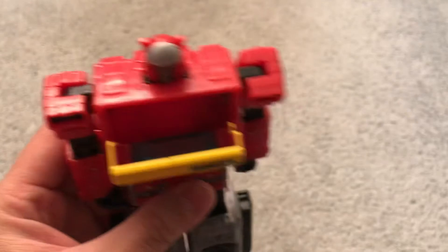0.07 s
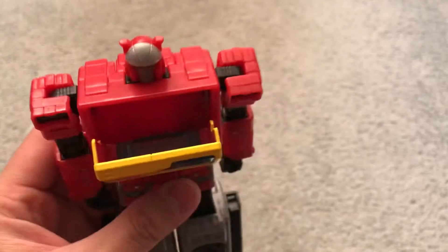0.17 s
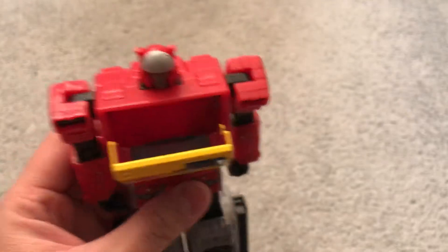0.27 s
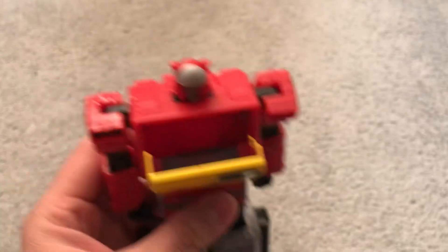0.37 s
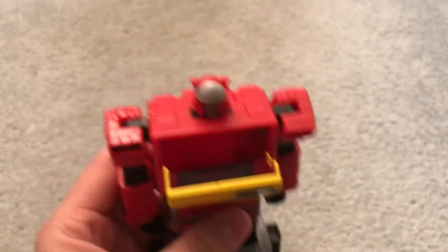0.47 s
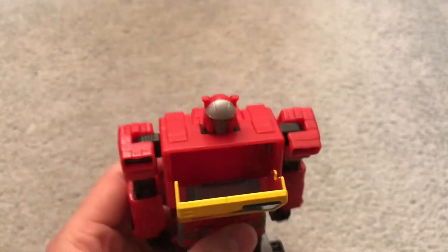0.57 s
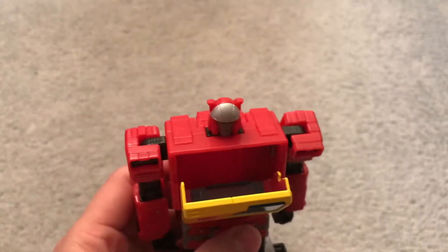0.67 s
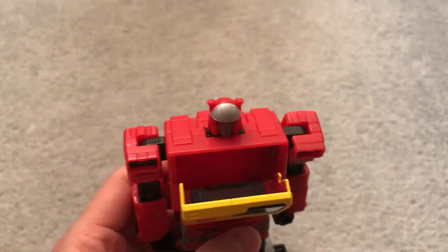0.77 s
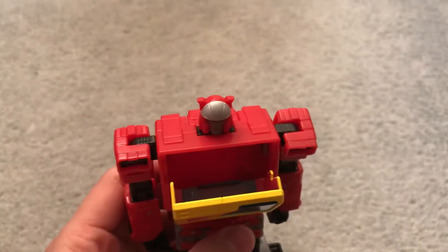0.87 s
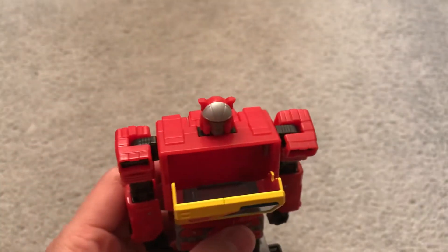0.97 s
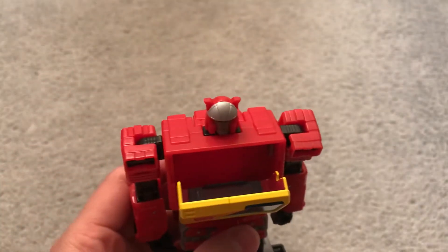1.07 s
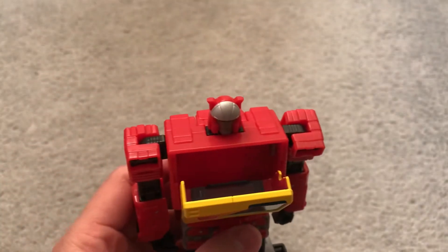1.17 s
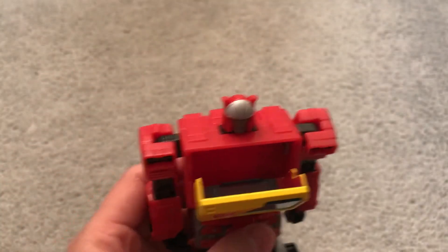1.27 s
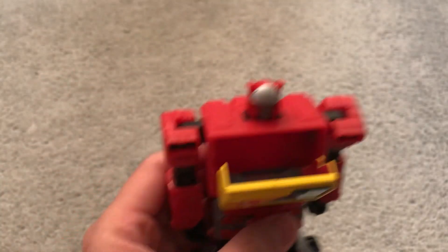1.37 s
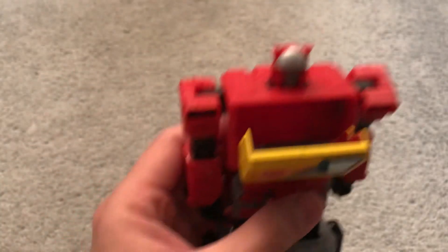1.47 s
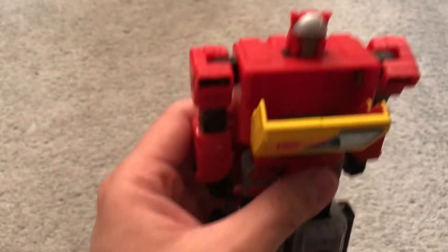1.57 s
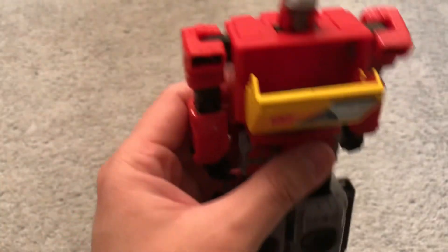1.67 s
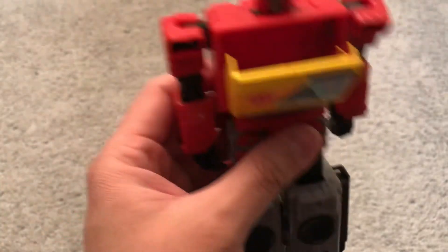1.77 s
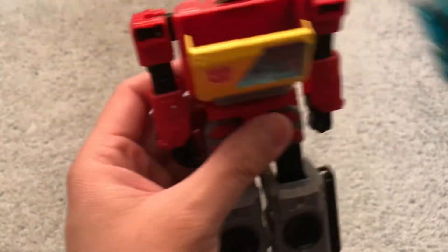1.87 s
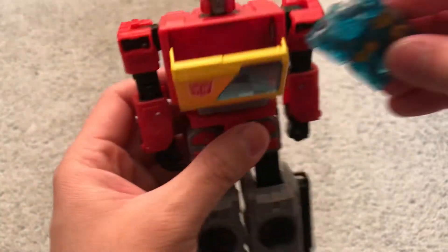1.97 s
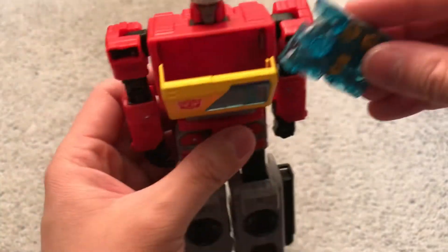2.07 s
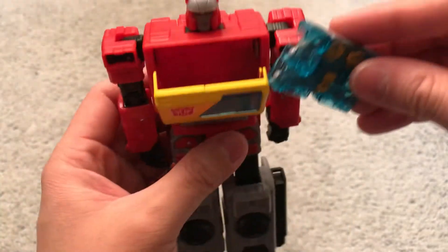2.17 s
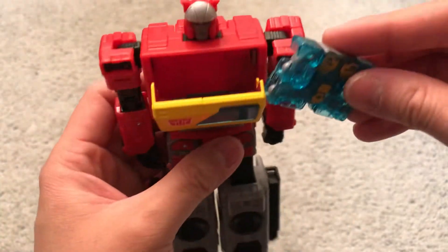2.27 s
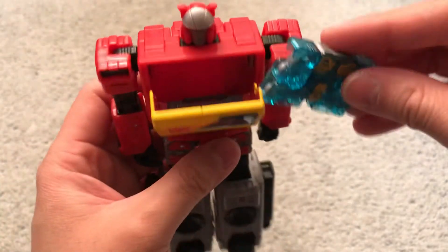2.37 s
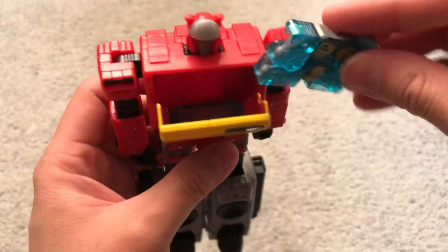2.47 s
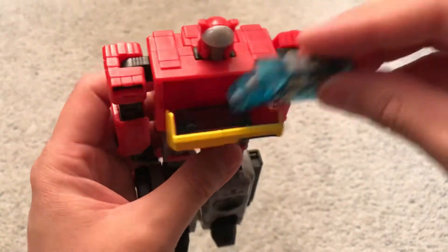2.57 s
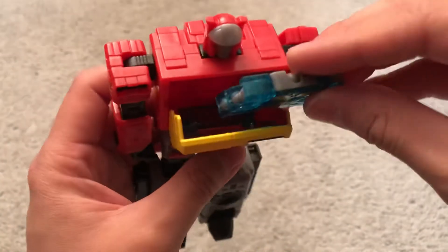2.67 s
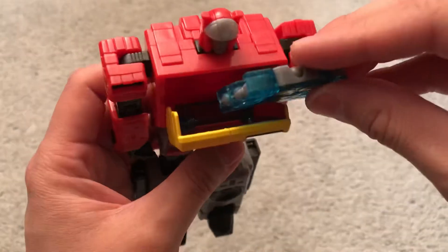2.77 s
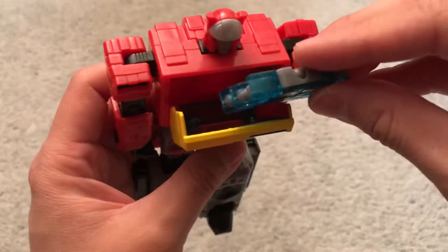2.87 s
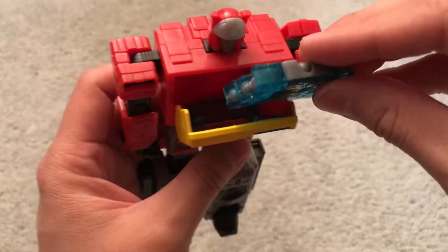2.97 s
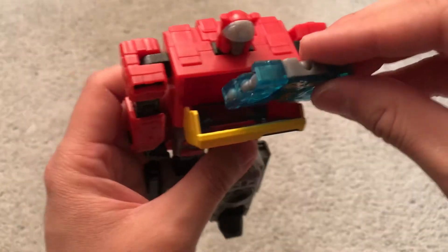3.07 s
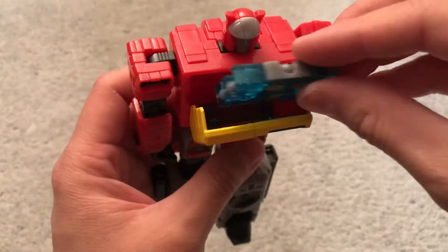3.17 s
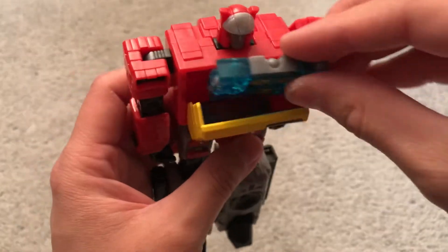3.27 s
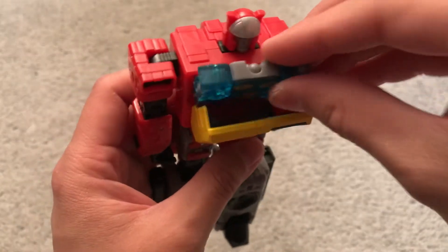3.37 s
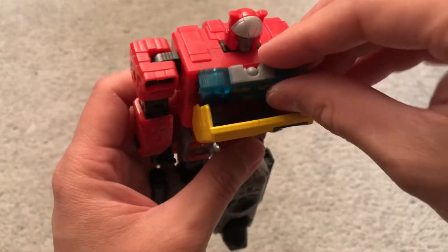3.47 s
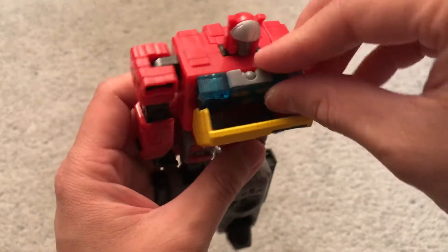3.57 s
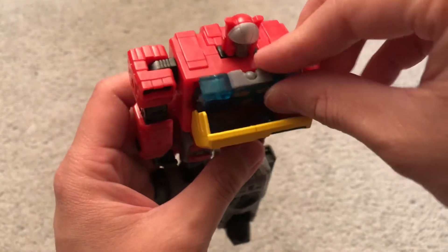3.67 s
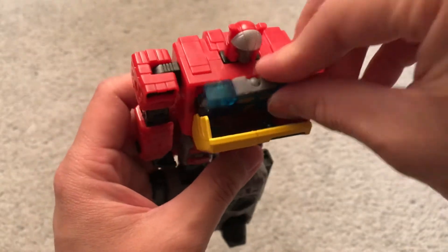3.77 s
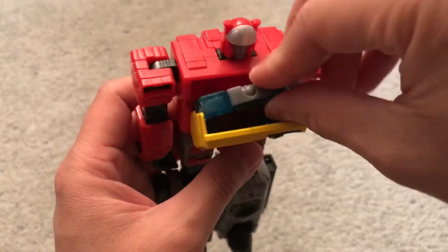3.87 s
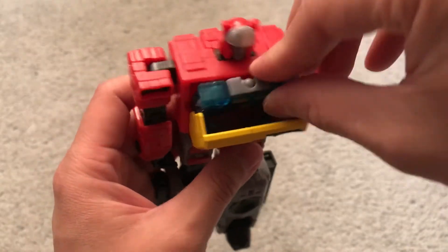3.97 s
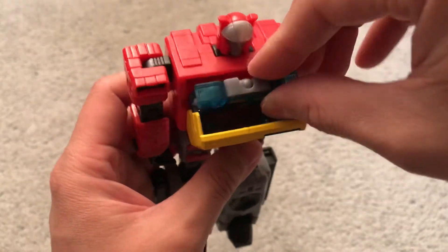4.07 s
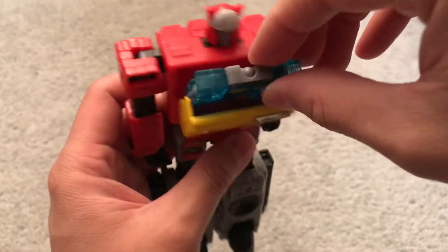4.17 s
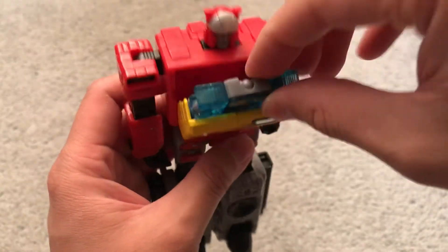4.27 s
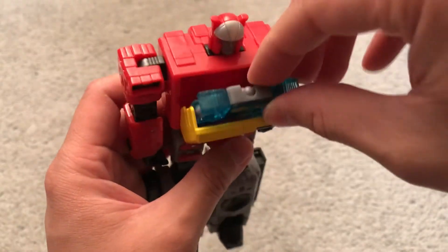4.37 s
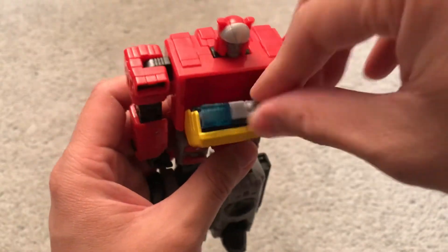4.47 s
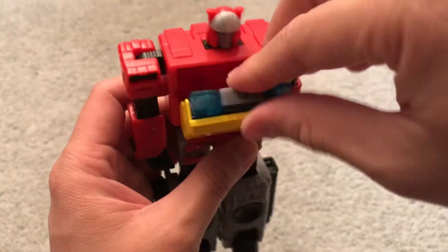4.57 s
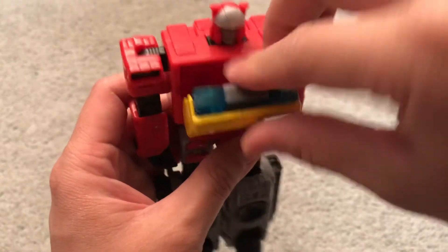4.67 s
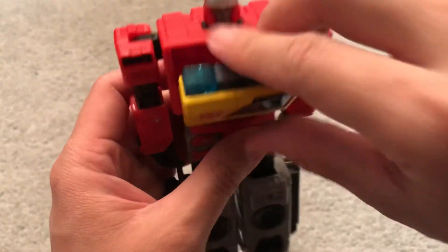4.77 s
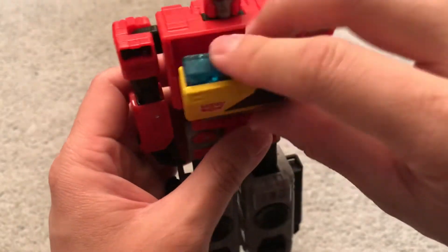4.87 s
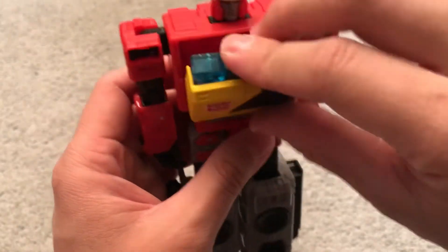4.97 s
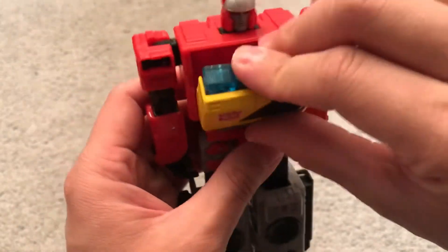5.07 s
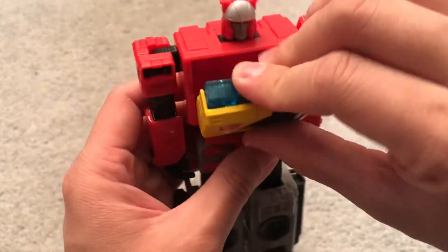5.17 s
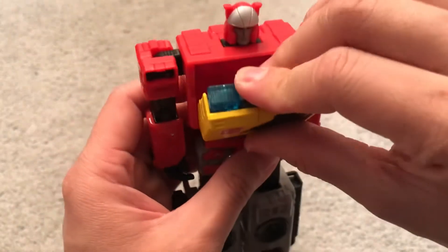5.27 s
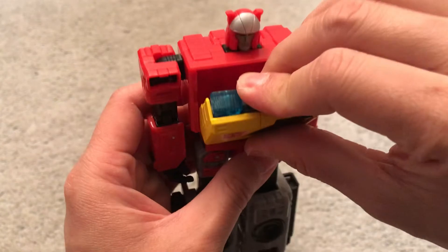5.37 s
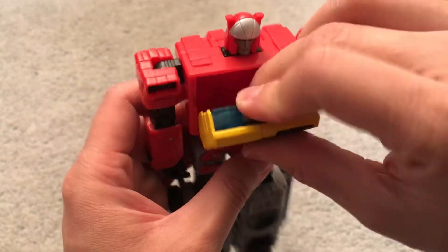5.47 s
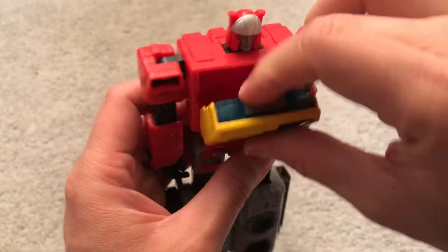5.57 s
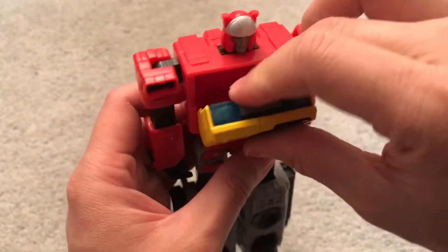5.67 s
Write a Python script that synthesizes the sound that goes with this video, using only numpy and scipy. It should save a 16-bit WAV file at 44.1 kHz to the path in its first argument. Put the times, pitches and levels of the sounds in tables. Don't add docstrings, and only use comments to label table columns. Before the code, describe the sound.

Close phone pickup of hands working a small hollow plastic toy in a quiet carpeted room, with faint mains hum, low building rumble and soft hiss throughout. After a quiet start, loose parts bump and scrape around 0.65 s, and a rattly double clack at 0.8 s makes the thin door ring briefly. A duller knock comes at 1.3 s, then mostly faint rubbing and a soft sleeve rustle from 1.5 to 2 s. Clicks resume at 2.2 s, with a stronger hollow knock at 2.6 s. From 3.0 to 3.6 s bright clacks come quickly as a block touches the shell; small taps and rubs continue, thickening into clicks and scrapes at 4.1 to 4.3 s. A crisp snap lands at 4.45 s. Quieter bumps, slides and ticks follow, a few clicks gather around 5.3 s, and the loudest, hard, bright catch snap strikes at 5.43 s, dying quickly into room tone.

```python
import sys
import numpy as np
from scipy import signal
from scipy.fft import rfft, irfft, next_fast_len
from scipy.io import wavfile
from scipy.ndimage import uniform_filter1d

SR = 44100
rng = np.random.default_rng(int(sys.argv[2]) if len(sys.argv) > 2 else 0)


def dump_mix(stems):
    frames = np.atleast_2d(stems).T
    limited = np.clip(frames, -1, 1)
    pcm = np.round(limited * 32767).astype(np.int16)
    wavfile.write(sys.argv[1], SR, pcm)


def natural_amplitude(level_db):
    exponent = np.asarray(level_db, float) / 20
    return 10 ** exponent


N = 252252

EDGE_HOLD, PART_HOLD = 0.064, 0.88


def evened(x):
    return x / np.sqrt(np.mean(x ** 2) + 1e-20)


def peaked(x):
    return x / np.sqrt(uniform_filter1d(x ** 2, size=60).max())


def read(points, hz):
    f, value = np.transpose(points)
    return np.interp(np.log(hz + 1), np.log(f + 1), value)


def add(mix, s, sound):
    part = mix[round(s * SR):][:len(sound)]
    part += sound[:len(part)]


def resonate(x, modes):
    size = next_fast_len(len(x) + 1024)
    f = np.fft.rfftfreq(size, 1 / SR)
    hz, width, db = np.transpose(modes)[:, :, None]
    single = 1.5j * f * width / (hz ** 2 - f ** 2 + 1.5j * f * width)
    response = (natural_amplitude(db) * single ** 2).sum(0)
    return irfft(rfft(x, size) * response, size)[:len(x)]


def coloured(points):
    size = next_fast_len(N)
    hz = np.fft.rfftfreq(size, 1 / SR)
    spectrum = rfft(rng.standard_normal(size)) * natural_amplitude(read(points, hz))
    return evened(irfft(spectrum, size)[:N])


def drift(size):
    once = uniform_filter1d(rng.standard_normal(N), size)
    return evened(uniform_filter1d(once, size))


def brightened(modes, treble_db, share):
    return [(f, w, d + share * treble_db * np.log2(f / 2700)) for f, w, d in modes]


def varied(modes, spread_db, luck):
    return [(f * (1 + spread_db / 120 * detune), w, d + spread_db * weight)
            for (f, w, d), detune, weight in zip(modes, luck, luck[12:])]


def contact(grit, contact_ms, held):
    t = np.arange(len(grit)) / SR * 1000
    rise = np.clip(t / (0.27 + 0.26 * held * contact_ms), 0, 1) ** 2
    release_ms = 0.4 + 1.09 * max(.9 - held, .05) * contact_ms
    force = rise * np.exp(-np.maximum(t - held * contact_ms - .25, 0) / release_ms)
    lumpy = rfft(force * grit)
    flatter = lumpy / np.abs(lumpy) ** min(.5, 2.5 / contact_ms)
    return force, np.sqrt(force) * irfft(flatter, len(grit))


# pitch in Hz, level in dB per Hz.
HISS = [(150, 3.5), (250, -11), (500, -13.5), (1000, -17), (2200, -21.5), (4600, -24), (7500, -30),
        (9300, -26.5), (10500, -35.5), (11800, -22), (13300, -23.5), (15700, -37.5), (16500, -38)]
# pitch in Hz, level in dB per Hz.
BUILDING = [(25, -14.5), (33, -15), (40, 3.5), (50, 7.5), (64, -3), (80, -10), (110, -7)]


def background():
    turns = np.cumsum(120.8 * (1 + .004 * drift(size=3000))) / SR
    hum = np.sqrt(2) * np.sin(2 * np.pi * turns) * natural_amplitude(-64 + 1.7 * drift(size=2500))
    hiss = natural_amplitude(-70.5) * coloured([(100, -52.5), *HISS])
    rumble = natural_amplitude(-60) * coloured([(11, -37.5), *BUILDING, (150, -40.5)])
    return hiss + rumble + hum


# time in seconds, level in dB.
SLEEVE_MOVES = [(0, -75.5), (.6, -72), (.69, -63), (.73, -68), (.8, -67.5), (0.921, -61), (1.1, -70.5),
                (1.27, -71.5), (1.31, -62), (1.42, -69.5), (1.85, -66.5), (2.0, -65.5), (2.1, -72.5),
                (3.5, -70.5), (5.72, -74.5)]


def sleeve():
    s, db = np.transpose(SLEEVE_MOVES)
    cloth = evened(resonate(rng.standard_normal(N), [(308, 150, 2.5), (530, 840, -6.5)]))
    return cloth * natural_amplitude(np.interp(np.arange(N) / SR, s, db) - 3 + 1.3 * drift(size=1500))


def panel(chance, db, hz, contact_ms, held):
    chatter = contact(chance[:1024], contact_ms, held)[1]
    width = np.clip(hz / 15, min(420, hz / 1.6), 1200)
    return natural_amplitude(db) * peaked(resonate(chatter, [(hz, width, 0)]))


# start in seconds, strength in dB, pitch in Hz, contact time in ms.
SECOND_PANELS = [(.5258, -63.5, 8300, 1.7), (.7085, -55, 14500, 2), (0.797, -51, 4070, 4.4),
                 (0.8042, -35.5, 6230, 2.5), (.805, -36, 12900, 2.4), (0.805, -40, 8400, 5.6),
                 (.806, -55, 1500, 3.5), (1.2895, -53, 520, 3.9), (1.2898, -54, 5400, 4),
                 (2.191, -51, 6500, 0.89), (2.3335, -56, 6700, 3), (2.3654, -49.5, 6640, 1.1),
                 (2.431, -59.5, 9400, 3), (2.6014, -54, 504, 3.6), (2.6016, -44, 1640, 1.8),
                 (2.603, -42, 4200, 1.8), (2.602, -39, 8070, 1.8), (2.6173, -40, 4000, 1.3),
                 (3.045, -47, 5750, 3.7), (3.045, -44, 1750, 3.5), (3.0729, -36.5, 2530, 1),
                 (3.0732, -40, 12800, 1.5), (3.074, -59, 790, 3), (3.3372, -53.5, 576, 4),
                 (3.338, -39.5, 7100, 2.6), (3.339, -45.5, 1570, 2.6), (3.338, -46, 12100, 2),
                 (3.4095, -47, 5630, 2), (3.451, -32, 2070, 1.1), (3.4556, -40, 5670, 2.1),
                 (4.096, -59, 328, 9.9), (4.0957, -37.5, 4280, 0.78), (4.2, -35, 4200, 0.89),
                 (4.201, -56.5, 720, 3.3), (4.2188, -48.5, 3930, .83), (4.266, -39, 12800, 2),
                 (4.268, -42, 4000, 1.3), (4.4445, -39.5, 6100, 2), (4.4491, -38, 1000, 4.5),
                 (4.449, -55, 316, 3.8), (4.450, -36, 1890, 3), (4.451, -33, 2900, 3.4),
                 (5.2562, -55.5, 1750, 2.2), (5.3321, -41.5, 2920, 0.83), (5.3778, -42.5, 2630, 1.1),
                 (5.4304, -16.5, 7960, 1.2), (1.2894, -59, 7000, 3), (3.0752, -46, 5800, 1),
                 (3.0733, -46, 4070, 1.5), (1.2889, -51.5, 1690, 2)]


def second_panels(chances):
    return [(s, panel(chance, *row, EDGE_HOLD)) for (s, *row), chance in zip(SECOND_PANELS, chances)]


def tail(decays, tone, start):
    hz, t, z = signal.stft(rng.standard_normal(SR // 2), SR, nperseg=128)
    fall = natural_amplitude(read(tone, hz)[:, None] - 60 * t / np.abs(read(decays, hz))[:, None])
    sound = signal.istft(z * fall, SR, nperseg=128)[1]
    sound = sound * np.clip(np.arange(len(sound)) / SR / start - 1, 0, 1)
    return sound / np.linalg.norm(sound)


# pitch in Hz, seconds to fall by 60 dB.
JOINT_DECAY = [(300, 0.1), (1000, 0.09), (3000, 0.034), (8000, 0.036), (15000, 0.046)]
# pitch in Hz, seconds to fall by 60 dB.
ROOM_DECAY = [(300, 0.18), (1000, 0.42), (3000, 0.33), (8000, 0.33), (15000, 0.16)]
# pitch in Hz, level in dB.
ROOM_COLOUR = [(300, 0.5), (1000, 1), (3000, -3.5), (8000, -7), (15000, -1.5)]


def after_sound(buzz_db, buzz_tone, buzz_start, room_db, room_start):
    buzz = natural_amplitude(buzz_db) * tail(JOINT_DECAY, buzz_tone, buzz_start)
    return buzz + natural_amplitude(room_db) * tail(ROOM_DECAY, ROOM_COLOUR, room_start)


# pitch in Hz, width in Hz, level in dB.
SHELL_MODES = [(2100, 230, -21.5), (2740, 490, -0.5), (3520, 420, -9.5), (4200, 730, 1.5), (5000, 1300, -1),
               (5670, 990, -1)]
# pitch in Hz, width in Hz, level in dB.
RIB_MODES = [(6630, 440, 10.5), (8430, 1200, 7.5), (9000, 3400, 6), (9470, 280, 4.5), (11800, 400, 8),
             (12600, 730, 2.5), (13300, 670, 1.5), (15300, 760, 3)]
# pitch in Hz, width in Hz, level in dB.
THUD_MODES = [(152, 66, -2), (356, 170, -12), (660, 400, 6.5), (1161, 590, 23.5), (1660, 670, 12)]


def knock(chance, db, hz, treble_db, contact_ms, thud_db, held=EDGE_HOLD, ribs=RIB_MODES, spread_db=2.5):
    force, chatter = contact(chance[:1024], contact_ms, held)
    luck = chance[1024:]
    shell = brightened(varied(SHELL_MODES, spread_db, luck), treble_db, 0.67)
    body = resonate(chatter, [(hz, 520, 0)]) + natural_amplitude(-4) * resonate(chatter, shell)
    treble = resonate(chatter, varied(ribs, spread_db, luck[24:]))
    thud = resonate(force + 5.9 * peaked(chatter), varied(THUD_MODES, spread_db, luck[48:]))
    jolt = natural_amplitude(-14.5) * peaked(resonate(force, [(380, 1200, 0)]))
    low = natural_amplitude(thud_db) * (peaked(thud) + jolt)
    return natural_amplitude(db) * (peaked(body) + natural_amplitude(treble_db) * peaked(treble) + low)


def played(events, chances, **settings):
    return [(s, knock(chance, *row, **settings)) for (s, *row), chance in zip(events, chances)]


# start in seconds, strength in dB, panel pitch in Hz, treble in dB.
BUMP_EVENTS = [(.6445, -56, 3030, -20), (.670, -51, 3600, -3), (.7164, -61, 2610, 1),
               (1.0025, -50.5, 3640, -10.5), (1.7223, -60.5, 3900, -3.5), (2.3206, -56, 6650, -14),
               (2.4306, -69, 2220, 2), (3.1019, -79, 2540, -15), (3.606, -53, 4200, -17),
               (3.6644, -67, 2670, 1), (3.6726, -72, 2730, -6), (3.683, -60, 4220, -7),
               (3.6934, -63, 2840, -14), (3.7629, -49, 2150, -19), (3.916, -63, 2740, -18),
               (4.0582, -56, 2440, -24), (4.1632, -44, 3080, -18), (4.2886, -50, 2860, -21),
               (4.687, -54, 2810, -4), (4.6975, -52.5, 2780, 1), (4.8628, -58, 3200, 4)]


def bumps(chances):
    return played(BUMP_EVENTS, chances, contact_ms=5.2, thud_db=-11, held=PART_HOLD)


# start in seconds, strength in dB, pitch in Hz, time to full swing in ms.
PING_EVENTS = [(.6445, -58.5, 5820, 1.9), (.6822, -48.5, 5880, 1.4), (.682, -48.5, 3050, 1.4),
               (.709, -58, 2890, 1.9), (.767, -63, 2900, 2), (2.313, -65, 6700, 8),
               (2.3655, -45, 2400, 1.5), (3.3375, -43, 2100, 1.2), (3.3695, -40, 4020, 1.2),
               (3.408, -46, 5700, 1.6), (3.4515, -33.5, 5760, 3.5), (3.4875, -49, 4320, 1.5),
               (3.5495, -35, 4454, 2.2), (3.595, -44, 4300, 1.2), (3.595, -46.5, 2950, 1.1),
               (4.4505, -29, 5790, 1.1), (4.4505, -29.5, 2955, 1.7), (4.4455, -34.5, 2394, 1.8),
               (4.610, -65, 2900, 10), (4.692, -51, 4150, 8), (4.688, -54.5, 2700, 9),
               (4.860, -55, 5500, 7), (4.766, -62, 5600, 1.5), (5.432, -44, 160, 6),
               (5.4325, -22.5, 15500, 1.5), (5.430, -22, 11470, 1.8), (2.602, -53, 320, 4),
               (4.450, -46, 800, 2.5), (2.348, -44, 2200, 2), (.716, -58, 335, 12)]


def pings():
    t, out = np.arange(2000) / SR, np.zeros(N)
    for s, db, hz, swing_ms in PING_EVENTS:
        u = 1000 * t / swing_ms
        swing = np.sqrt(2) * u * np.exp((1 - u ** 2) / 2)
        add(out, s, natural_amplitude(db) * swing * np.sin(2 * np.pi * hz * t))
    return out


# pitch in Hz, width in Hz, level in dB.
BLOCK_MODES = [(2850, 630, 3), (4200, 490, 4), (5630, 1400, 1.5)]


def slide(chance, length, db, hiss_db, most, pitch):
    grit, sizes, wobble = chance[:, :round(length * SR)]
    size = len(grit)
    swell = np.interp(np.linspace(0, 1, size), [0, most, 1], [-1, 0, -1.4])
    flutter = natural_amplitude(-1.5 * evened(uniform_filter1d(wobble, size=90)))
    grains = grit * natural_amplitude(5 * sizes) * flutter
    block = [(f * pitch, w, d) for f, w, d in BLOCK_MODES]
    body = resonate(grains, brightened(block, hiss_db, 0.45))
    sound = evened(body) + natural_amplitude(hiss_db) * evened(resonate(grains, RIB_MODES))
    return natural_amplitude(db - 12 * swell ** 2) * sound * signal.windows.tukey(size, .15)


# start in seconds, length in seconds, pressure in dB, fine hiss in dB.
SLIDE_EVENTS = [(.676, 0.041, -54, -3), (1.41, 0.11, -77, 1.5), (2.308, 0.018, -67, -6),
                (2.334, 0.031, -55, -18), (2.79, 0.071, -70.5, -21), (2.87, 0.1, -66.5, -38),
                (3.168, 0.045, -77, 6), (3.63, 0.14, -62, -12.5), (4.035, 0.091, -67, -18),
                (4.102, 0.055, -50, -6), (4.133, 0.029, -52, -5), (4.204, 0.043, -52, -8),
                (4.422, 0.032, -49.5, -2.5), (4.655, 0.039, -63.5, -4), (4.684, 0.02, -51.5, -12.5),
                (4.745, 0.058, -65.5, -3), (3.412, 0.023, -59, -1)]


def slides(chances):
    return [(s, slide(chance, *row, most=0.33, pitch=0.95)) for (s, *row), chance in zip(SLIDE_EVENTS, chances)]


# start in seconds, strength in dB, panel pitch in Hz,
# treble in dB, contact time in ms.
KNOCK_EVENTS = [(.682, -43, 5770, -11, 2.2), (.8049, -31.5, 3730, -1.5, 1.1), (2.3482, -37, 2560, -11, 1.3),
                (2.3655, -38.5, 2500, -36, 3.9), (2.601, -24.5, 2980, -14, 1.8),
                (3.0447, -28, 2950, -40, 1.2), (3.0807, -36, 2570, -13, 1),
                (3.3371, -32.5, 3300, -1.5, 2.5), (3.408, -31, 2560, -6.5, 1.1),
                (3.7767, -44, 2920, -5, 2.9), (4.2192, -32.5, 2630, -7, 2),
                (1.2895, -46.5, 3180, -2.5, 3.7), (5.3772, -39.5, 4100, -9, 0.89), (.839, -47, 2820, -3, 3)]


def knocks(chances):
    return played(KNOCK_EVENTS, chances, thud_db=-18)


# pitch in Hz, level in dB, seconds to fall by 60 dB.
DOOR_MODES = [(368, 6, 0.041), (1112, 3, 0.079), (1750, 5, 0.15), (2560, -20, 0.046)]
# start in seconds, strength in dB.
DOOR_JOLTS = [
    (0.682, -61),
    (0.805, -65),
    (1.289, -58.5),
]


def door():
    t, out = np.arange(6000) / SR, np.zeros(N)
    ring = sum(natural_amplitude(db - 60 * t / t60) * np.sin(2 * np.pi * hz * t) for hz, db, t60 in DOOR_MODES)
    for (s, db), grit in zip(DOOR_JOLTS, rng.standard_normal((8, 1500))):
        shaking = grit * np.exp(-t[:1500] / 0.0078)
        add(out, s, natural_amplitude(db) * peaked(signal.fftconvolve(ring, shaking)))
    return out


# start in seconds, strength in dB, panel pitch in Hz, treble in dB.
SCUFF_EVENTS = [(.7091, -52.5, 3030, 0), (2.6551, -66, 2950, -17), (2.759, -53, 2750, -50),
                (2.816, -56.5, 2840, -34), (2.9769, -49, 2120, -15), (3.346, -52, 2380, -14),
                (3.3865, -42, 3030, -25), (3.94, -53, 2530, -16), (3.945, -51, 4450, -11),
                (4.082, -43.5, 4400, -16), (4.2086, -49, 2500, -6), (.7665, -57, 2970, -8),
                (5.3409, -60.5, 2970, -22)]


def scuffs(chances):
    return played(SCUFF_EVENTS, chances, contact_ms=1.6, thud_db=-30)


# start in seconds, strength in dB, pitch in Hz, contact time in ms.
SQUEAK_EVENTS = [(0.717, -56, 327, 20), (2.283, -64, 3770, 15), (2.313, -72, 6400, 14),
                 (2.339, -53, 6400, 3.7), (3.060, -59, 6200, 5.2), (4.6, -72, 4240, 15),
                 (4.2, -62, 4200, 15), (4.135, -54, 5670, 9), (4.172, -46, 9000, 5.5),
                 (4.424, -45.5, 13000, 11), (4.435, -45.5, 2850, 6.7), (4.4505, -31.5, 6500, 3.2),
                 (4.697, -49, 4200, 6.4), (4.858, -64, 5520, 19), (5.4258, -35, 4540, 3),
                 (5.4311, -18.5, 3270, 4.6), (5.434, -52, 526, 10.6), (5.441, -28, 4080, 9),
                 (5.4397, -42, 1080, 19), (5.443, -36, 8000, 2.5), (5.441, -37, 2500, 17),
                 (.809, -49, 3700, 6), (.812, -50, 8300, 5), (.816, -46, 6600, 8.6), (0.819, -54, 2700, 4),
                 (.829, -57, 2700, 6), (0.8398, -56.5, 1250, 5), (.8395, -51, 6400, 5),
                 (4.103, -45.5, 2850, 20), (4.137, -44, 2750, 9.8), (4.168, -43.5, 2570, 7.5),
                 (4.182, -46, 2640, 5.8), (4.272, -43, 2650, 3.3), (4.287, -49.5, 2850, 5),
                 (4.270, -48, 5760, 7), (3.08, -48, 1290, 4.7), (3.081, -57, 5700, 4.5),
                 (3.083, -45, 2600, 2.5), (4.485, -56, 2650, 12), (5.434, -49.5, 167, 7.5),
                 (1.2908, -52.5, 400, 4.5), (2.603, -50.5, 780, 5.5), (4.452, -55.5, 290, 5.4)]


def squeaks(chances):
    return [(s, panel(chance, *row, PART_HOLD)) for (s, *row), chance in zip(SQUEAK_EVENTS, chances)]


# start in seconds, strength in dB, panel pitch in Hz, treble in dB.
TICK_EVENTS = [(.745, -55.5, 3180, -3), (.871, -67, 4000, -6), (2.333, -46, 2850, -5),
               (2.3375, -61, 2260, 3), (2.373, -72, 2240, -16), (2.7029, -60, 2470, -25),
               (3.049, -49, 2940, -25), (3.0575, -39, 2580, -28), (3.8302, -49.5, 4360, -8),
               (3.8767, -54, 2620, -24), (3.9065, -61, 2900, -18), (4.248, -76, 2610, -15),
               (4.7665, -57, 5660, 0.5), (5.08, -58, 3160, -14.5), (5.1797, -61, 3200, -31),
               (5.2064, -44, 4640, -6), (5.266, -45.5, 4530, -11), (5.3237, -53, 4300, -5),
               (5.4075, -50, 3200, 2), (5.4105, -50, 4100, -8)]


def ticks(chances):
    return played(TICK_EVENTS, chances, contact_ms=1.2, thud_db=-32)


# start in seconds, length in seconds, pressure in dB, fine hiss in dB.
PUSH_EVENTS = [(.775, 0.032, -62.5, -1), (2.255, 0.061, -71.5, -10), (2.349, 0.024, -58.5, 6),
               (3.115, .059, -84, 5), (3.912, 0.014, -55.5, -10.5), (3.955, 0.04, -67, -15),
               (4.838, 0.031, -60, -2), (4.895, 0.071, -70, -3), (4.955, 0.052, -63.5, -4.5),
               (5.416, 0.01, -48.5, -3), (3.326, 0.017, -64, 5), (3.399, 0.0084, -66, 2),
               (3.515, 0.036, -64, -5), (4.166, 0.009, -64, -5)]


def pushes(chances):
    return [(s, slide(chance, *row, most=0.74, pitch=1)) for (s, *row), chance in zip(PUSH_EVENTS, chances)]


# start in seconds, strength in dB, panel pitch in Hz, treble in dB.
TAP_EVENTS = [(.7962, -47, 6700, -14), (.861, -57, 6400, -17), (1.0273, -58, 3100, -6),
              (1.2985, -57, 4970, -3), (1.307, -56, 3900, -2), (2.6354, -42.5, 2350, -21),
              (2.646, -47.5, 2480, -22), (2.7683, -54.5, 2190, -31), (2.778, -60, 3020, -31),
              (2.9033, -83, 2930, -22), (2.91, -73, 2930, -22), (3.2695, -51.5, 2220, -18),
              (3.759, -58, 4200, -12), (3.7962, -49, 2680, -13), (3.8155, -47.5, 2700, -5),
              (3.914, -59, 3560, -15), (3.9729, -57, 2090, -21), (4.0291, -44.5, 2550, -11.5),
              (4.1803, -47, 2410, -8), (4.2285, -45, 3100, -19), (4.4218, -53, 2800, 0),
              (4.5108, -49, 4470, -9), (4.5218, -51, 2700, 0), (5.2551, -42.5, 4080, -16),
              (5.359, -49, 2490, -11), (5.4247, -41, 2860, -6)]


def taps(chances):
    return played(TAP_EVENTS, chances, contact_ms=1.2, thud_db=-9.5)


# start in seconds, length in seconds, pressure in dB, fine hiss in dB.
SETTLE_EVENTS = [
    (.809, 0.034, -51, 4),
    (1.51, .23, -75.5, 3),
    (2.62, 0.033, -71, -10),
    (4.162, 0.047, -57, 3.5),
    (4.268, 0.041, -51, -3),
    (4.603, 0.071, -62.5, -2),
    (5.003, 0.07, -63, -2.5),
    (.841, 0.061, -57.5, -2.5),
]


def settles(chances):
    return [(s, slide(chance, *row, most=0.067, pitch=0.99)) for (s, *row), chance in zip(SETTLE_EVENTS, chances)]


def swish():
    out = np.zeros(N)
    u = np.linspace(0, 1, round(0.44 * SR))
    cloth = evened(resonate(rng.standard_normal(N), [(1100, 290, -3), (1740, 550, -14), (4000, 380, -8)]))
    patchy = cloth * natural_amplitude(2.3 * drift(size=900))
    swell = np.sqrt(np.sin(np.pi * u ** 1.3).clip(0))
    add(out, 1.55, natural_amplitude(-74) * swell * patchy[:len(u)])
    return out


# start in seconds, strength in dB, panel pitch in Hz,
# treble in dB, contact time in ms.
CLICK_EVENTS = [(2.19, -41.5, 2660, -13.5, 2.2), (2.6172, -34.5, 5600, -10, 1.2),
                (3.0729, -36, 5730, -1, 0.73), (3.3685, -27.5, 2870, -9, 1.9),
                (3.4514, -29.5, 5580, -14, 3.1), (3.487, -39.5, 2560, -9.5, 0.97),
                (3.544, -44, 4500, -10, 1.1), (3.5495, -30.5, 4570, -5, 1.7),
                (3.5948, -38.5, 4430, -7, 1.9), (3.8041, -39.5, 3920, -2, 1.3),
                (4.0963, -31, 2800, -13.5, 0.92), (4.1757, -35, 2540, -27.5, 1.7),
                (4.2003, -27, 2570, -7.5, 2.5), (4.2655, -30.5, 2800, -6.5, 2.7),
                (5.3321, -32.5, 4580, -8.5, 0.92)]


def clicks(chances):
    return played(CLICK_EVENTS, chances, thud_db=-26.5)


# pitch in Hz, width in Hz, level in dB.
CATCH_MODES = [(6200, 800, 5), (8230, 1100, 10), (9000, 2300, -3), (9840, 360, 6), (11470, 810, 9),
               (14000, 880, -2.5), (13800, 500, 1.5), (15100, 460, 3)]
# start in seconds, strength in dB, panel pitch in Hz,
# treble in dB, contact time in ms.
SNAP_EVENTS = [
    (4.4448, -27, 2560, -17, 7.3),
    (4.4495, -19, 4520, -2, 5.1),
    (5.4294, -13, 3080, -1, 3.27),
    (5.4328, -7, 4096, -4.5, 2.2),
]


def snaps(chances):
    return played(SNAP_EVENTS, chances, thud_db=-21.5, held=.76, ribs=CATCH_MODES, spread_db=3.5)


def scene():
    toy, catch = np.zeros((3, N)), np.zeros(N)
    loose = [after_sound(-14, [(300, -0.5), (5000, -2), (15000, -7)], 0.0016, -19.5, 0.0018) for _ in toy]
    around = sleeve() + background() + door() + swish() + pings()
    hits, rubs = rng.standard_normal((9, 50, 1100)), rng.standard_normal((3, 24, 3, 8000))
    kinds = [second_panels(hits[8]), bumps(hits[5]), slides(rubs[0]), knocks(hits[1]),
             scuffs(hits[6]), squeaks(hits[7]), ticks(hits[4]), pushes(rubs[1]),
             taps(hits[3]), settles(rubs[2]), clicks(hits[2])]
    for events in kinds:
        for k, (s, sound) in enumerate(events):
            add(toy[k % 3], s, sound)
    for s, sound in snaps(hits[0]):
        add(catch, s, sound)
    wet = signal.oaconvolve(toy, np.array(loose), axes=1)[:, :N]
    tight = after_sound(-15.5, [(300, -1), (2000, -0.5), (5000, -5), (15000, -8)], 0.0028, -20.5, 0.0038)
    return ((toy + wet).sum(0) + catch + signal.oaconvolve(catch, tight)[:N] + around)[None]


def roll_off(x):
    return signal.sosfilt(signal.butter(12, 16810, fs=SR, output="sos"), x)


# pitch in Hz, gain as a plain factor.
TOP_LIMIT = [(0, 1), (15850, 1), (16050, .15), (16700, .1), (16850, 0), (SR / 2, 0)]


def record(dry):
    faded = dry * np.clip(np.arange(N) / (0.00072 * SR), 0, 1)
    dip = signal.lfilter(*signal.iirpeak(10370, 10370 / 660, SR), faded)
    softened = .85 * np.tanh((faded - 0.44 * dip) / .85)
    band_filter = signal.firwin2(1023, *np.transpose(TOP_LIMIT), fs=SR)
    limited = signal.oaconvolve(softened, band_filter[None], "same")
    return roll_off(limited)


dry = scene()
out = record(dry)
dump_mix(out)
```